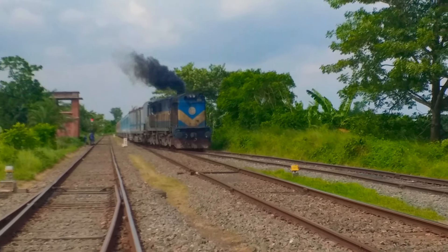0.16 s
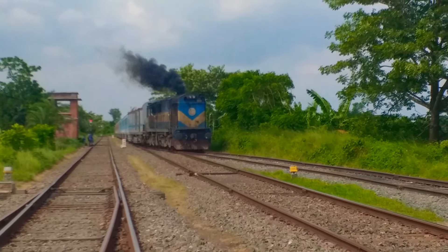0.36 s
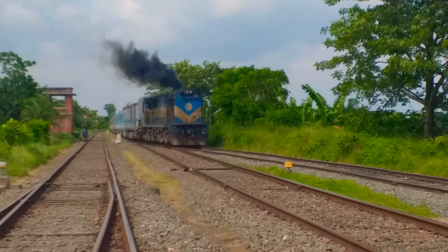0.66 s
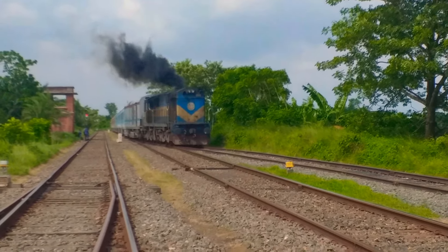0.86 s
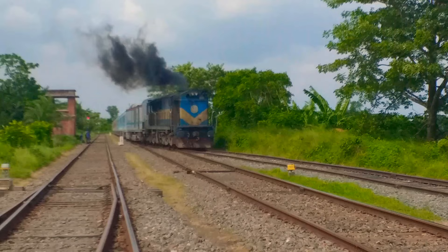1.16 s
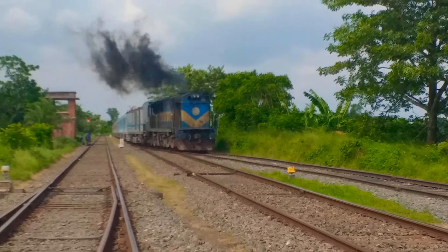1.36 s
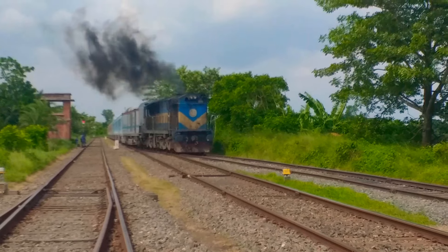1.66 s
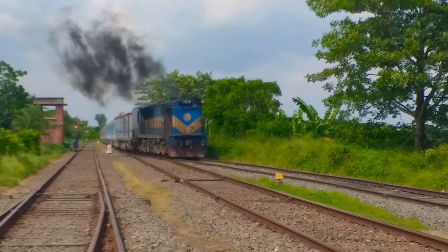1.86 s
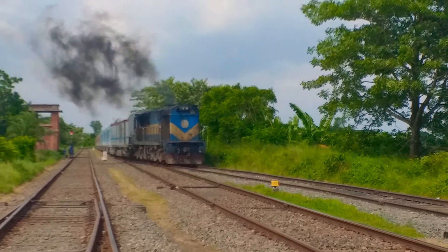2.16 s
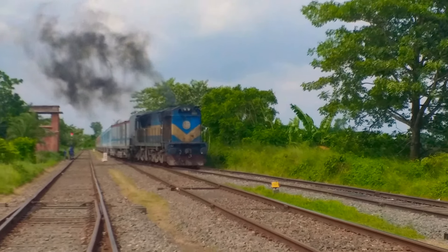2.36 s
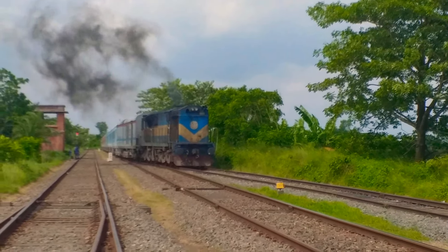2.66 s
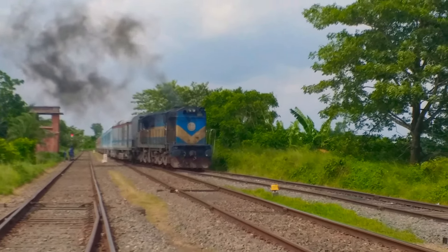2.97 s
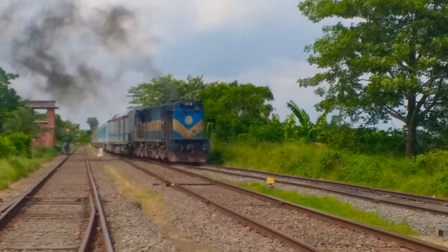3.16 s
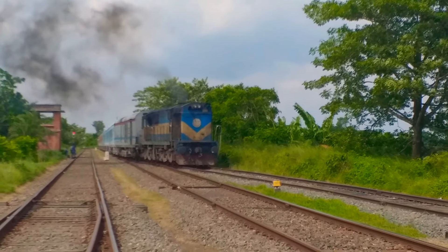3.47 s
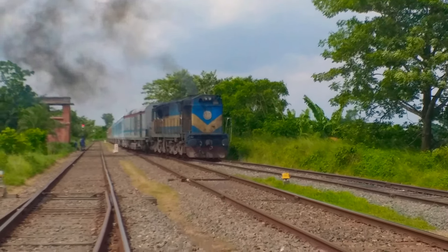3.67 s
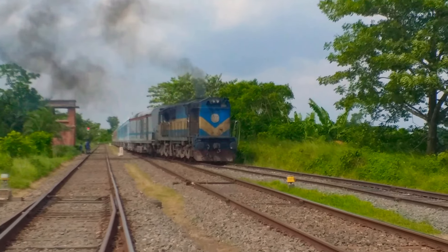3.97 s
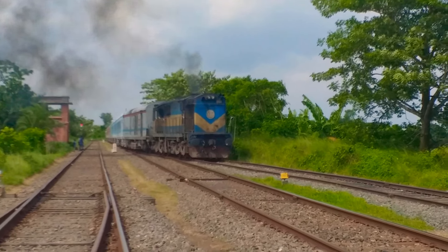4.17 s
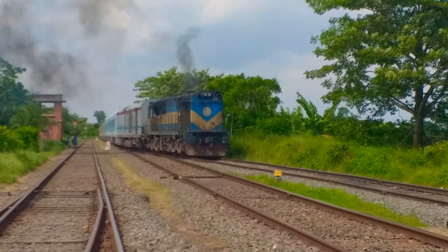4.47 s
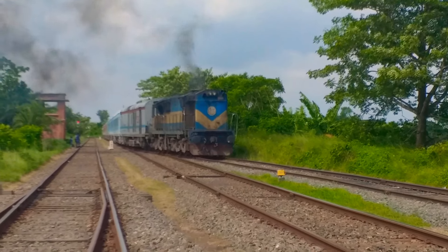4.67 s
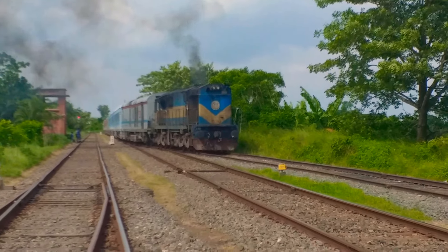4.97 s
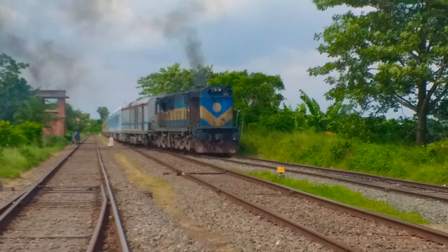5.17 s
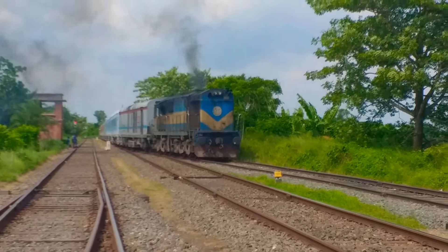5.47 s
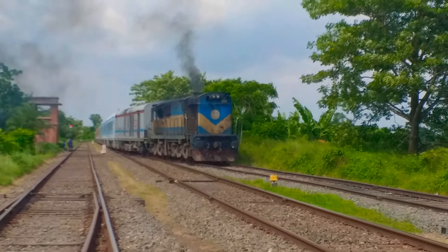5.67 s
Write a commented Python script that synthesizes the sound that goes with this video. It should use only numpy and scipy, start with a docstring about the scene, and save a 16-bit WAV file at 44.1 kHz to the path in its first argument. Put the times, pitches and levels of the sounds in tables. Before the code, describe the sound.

An open-air mono recording of a diesel locomotive coming slowly along the tracks. From the start there are low wind thuds on the microphone, a throbbing exhaust drone around 76 hertz with its stronger octave, and a hissing rush of machinery and wheels. From about 0.15 s a leak spits raspily, nearly five times a second, each with a bright crack, weak side puffs and a short scattered tail; a few catch brief whistles. Thin, unsteady wheel tones sing between 0.2 and 1.9 s. Gusts thump at 1.1-1.5 s; after 1.6 s the spits come slightly slower. More blows strike around 1.8 and 2.4-2.75 s. The hardest, from 3.55 to 4.1 s, boom, snap and crackle into overload. Then it calms, with spits softest near 4.9 s, leaving drone and hiss clear. A last gust thuds at 5.2-5.5 s as a faint high wheel tone rises and the engine strengthens.

```python
"""A diesel locomotive runs near a microphone in gusty wind, for almost six seconds.
At once there are low thuds, a droning exhaust and a hissing rush; soon a leak spits once per engine cycle.
Thin wheel tones sing early on. After 1.6 s the spits come slightly slower, and the gusts return in bursts.
The hardest thuds, near 3.6 s, drive a limiter; after a calmer spell, wheel tones and a last gust end the scene.
Shaped noise makes the hiss, rumble and wind; sine waves make the drone, whistles and wheel tones."""
import sys
import numpy as np
from scipy import signal
from scipy.fft import rfft, irfft
from scipy.io import wavfile
from scipy.ndimage import uniform_filter1d, minimum_filter1d

SR = 44100
rng = np.random.default_rng(int(sys.argv[2]) if len(sys.argv) > 2 else 0)


def wav_record(signal):
    """Record a signal, one row per channel, as 16-bit PCM in the file named by sys.argv[1]."""
    frames = np.transpose(np.atleast_2d(signal))
    bounded = np.clip(frames, -1, 1)
    # unit amplitude maps onto the largest positive 16-bit level
    quanta = np.round(bounded * 32767).astype(np.int16)
    wavfile.write(sys.argv[1], SR, quanta)


N = 256662
T = np.arange(N) / SR  # time of each sample, s
HZ = np.fft.rfftfreq(N, 1 / SR)


def gain_of(db):
    """Turns decibels into an amplitude factor."""
    return 10 ** (np.asarray(db) / 20)


def evened(x):
    """Scales a sound to an average strength (rms) of 1."""
    return x / np.sqrt(np.mean(x ** 2) + 1e-20)


def curves(rows):
    """Joins the points in each column of a table by straight lines in time."""
    s, *columns = np.transpose(rows)
    return [np.interp(T, s, column) for column in columns]


def noise(colour):
    """Makes noise of rms 1 whose spectrum follows points of (pitch_hz, level_db)."""
    hz, db = np.transpose(colour)
    spectrum_db = np.interp(np.log(HZ + 1), np.log(hz), db)
    return evened(irfft(rfft(rng.standard_normal(N)) * gain_of(spectrum_db), N))


def wander(rate_hz):
    """Makes a random motion of rms 1; a higher rate makes it quicker."""
    return evened(irfft(rfft(rng.standard_normal(N)) * np.exp(-(HZ / rate_hz) ** 2), N))


def patchy(x, depth_db):
    """Turbulent air lets small patches of time and frequency come through stronger or weaker."""
    z = signal.stft(x, nperseg=1024, noverlap=768)[2]
    patches = uniform_filter1d(rng.standard_normal(z.shape), size=5, axis=0)  # across frequency
    patches = evened(uniform_filter1d(patches, size=12, axis=1))  # across time
    return signal.istft(z * gain_of(depth_db * patches), nperseg=1024, noverlap=768)[1][:N]


def brighten(x, treble_db, split_hz=4000):
    """Raises or lowers everything above the split by a curve."""
    body = irfft(rfft(x) / (1 + (HZ / split_hz) ** 6), N)
    return body + gain_of(treble_db) * (x - body)


def add(mix, s, sound):
    """Adds a sound to the mix from time s on, cutting off what falls outside."""
    start = round(s * SR)
    sound = sound[max(-start, 0):]
    part = mix[max(start, 0):][:len(sound)]
    part += sound[:len(part)]


def wind_response(hz, corner_hz, low_cut_hz=61, knee_hz=135, damping=1.38, top_hz=3500, boom_hz=122, boom=0.44):
    """Wind pressure falls off above a knee and faster above the corner; the low cut makes it ring and boom."""
    low_cut = signal.freqs(*signal.butter(5, 1, "high", analog=True), hz / low_cut_hz)[1]
    s, b = 1j * hz / corner_hz, 1j * hz / boom_hz
    lift = 1 + boom * .5 * b / (1 + .5 * b + b ** 2)
    return lift * low_cut / (1 + 1j * hz / knee_hz) / (1 + damping * s + s ** 2) / (1 + 1j * hz / top_hz)


# a gust arrives at once, sags while it lasts, and dies away
GUST_ATTACK_DB_PER_S, GUST_SAG_DB, GUST_RELEASE_DB_PER_S = 1500, 3.5, 276


def gust_db(t, start, length, db):
    """Follows the strength of one gust at time t: attack, sagging hold, release."""
    early = np.maximum(start - t, 0)
    late = np.maximum(t - start - length, 0)
    sag_db = GUST_SAG_DB * np.clip((t - start) / length, 0, 1)
    return db - GUST_ATTACK_DB_PER_S * early - sag_db - GUST_RELEASE_DB_PER_S * late


# buffeting relative to its gust, between gusts, and the time over which it is smoothed
BREEZE_DB, CALM_DB, BREEZE_LAG_S = -0.5, -42, 0.037
# gusts at the microphone, also used by eddies(): start_s, length_s, relative strength_db, brightness_corner_hz
GUSTS = [(0, 0.043, -27, 330), (0.175, 0.13, -22.5, 340), (.3, 0.057, -29, 400), (0.499, 0.15, -30.5, 340),
         (1.169, 0.053, -18.5, 327), (1.315, .12, -14.5, 360), (1.814, 0.029, -20, 377),
         (2.36, 0.018, -15, 473), (2.552, 0.12, -18, 453), (2.725, 0.11, -25.5, 400),
         (3.058, 0.13, -19, 394.5), (3.543, 0.29, -17, 380), (3.854, .27, -14, 332),
         (4.11, 0.13, -20.5, 330), (4.25, 0.076, -30.5, 338), (5.226, 0.17, -25, 430)]


def breeze():
    """Makes lumpy low buffeting: wind noise that swells with the gusts."""
    power = sum(gain_of(gust_db(T, start, length, db) + BREEZE_DB) ** 2 for start, length, db, _ in GUSTS)
    smooth_power = abs(uniform_filter1d(power, int(BREEZE_LAG_S * SR)))
    swell = np.sqrt(smooth_power + gain_of(CALM_DB) ** 2)
    flow = evened(irfft(rfft(rng.standard_normal(N)) * wind_response(HZ, corner_hz=245), N))
    return swell * evened(flow * gain_of(1.47 * wander(rate_hz=24)))


EDDY_LEAD_S = .04  # room kept before the middle of an eddy


def eddy(db, spread_s, corner_hz):
    """Makes a short burst of random pressure on the microphone port."""
    size = 8192
    t, hz = np.arange(size) / SR - EDDY_LEAD_S, np.fft.rfftfreq(size, 1 / SR)
    z = rfft(rng.standard_normal(size) * np.exp(-(t / spread_s) ** 2 / 2))
    z /= np.sqrt(abs(uniform_filter1d(abs(z) ** 2, size=45)) + 1e-9)  # every eddy holds swirls of all sizes
    return gain_of(db - 9.0) * evened(irfft(z * wind_response(hz, corner_hz)))


# the small eddies that a gust sheds: how many, how long, and the largest random change of level
EDDIES_PER_S, EDDY_SPREAD_S, EDDY_SCATTER_DB = 44, .0028, 4.0
# thuds that stand out singly: middle_s, relative strength_db, spread_s, brightness_corner_hz
THUDS = [(.008, -16.5, 0.0032, 340), (.085, -16.5, 0.0025, 670), (.135, -10.5, 0.0089, 514),
         (0.1996, -13.5, 0.0044, 445), (.229, -9, 0.0036, 298), (.51, -21, 0.0051, 396),
         (.57, -18.5, 0.0064, 348), (0.659, -17.5, 0.0073, 320), (1.0762, -11, 0.0034, 355),
         (1.377, -9.5, 0.0042, 425), (1.414, -9.5, 0.0086, 309), (1.4751, -10, .0011, 460),
         (1.8264, -12, 0.0024, 470), (2.379, -14.5, 0.0011, 695), (2.395, -11, 0.0019, 386),
         (2.574, -5.5, 0.0038, 343), (2.596, -11, .0022, 504), (2.7326, -6, .0008, 634),
         (2.7434, -13, 0.0027, 390), (3.08, -15.5, 0.0048, 560), (3.165, -19.5, 0.0023, 450),
         (3.254, -16, 0.0053, 299), (3.505, -16.5, 0.0065, 480), (3.563, -0.5, 0.0025, 830),
         (3.588, -8, 0.0048, 672), (3.604, -8, 0.0021, 430), (3.632, -6.5, 0.0026, 350),
         (3.703, -14.5, 0.0036, 619), (3.734, -14, 0.0035, 487), (3.852, -16, 0.0015, 426),
         (3.877, -6, 0.004, 916), (3.937, -10, 0.0073, 644), (3.9994, -12, 0.0029, 470),
         (4.076, -4, 0.0019, 420), (5.178, -23, 0.0014, 490), (5.331, -15, 0.01, 457),
         (5.372, -10.5, 0.0058, 477), (5.392, -8.5, 0.0044, 373), (5.48, -19.5, 0.0067, 443)]


def eddies(colour_scatter=0.3):
    """Adds the hard thuds and the irregular train of smaller eddies that the gusts shed."""
    out = np.zeros(N)
    for s, *shape in THUDS:
        add(out, s - EDDY_LEAD_S, eddy(*shape))
    slots = np.arange(0, N / SR, 1 / EDDIES_PER_S)
    for slot, (late, strong, bright) in zip(slots, rng.uniform(-1, 1, (len(slots), 3))):
        s = slot + 0.397 * late / EDDIES_PER_S
        # the gust that is strongest at this moment sets level and brightness
        db, corner_hz = max((gust_db(s, start, length, db), hz) for start, length, db, hz in GUSTS)
        level_db = db + EDDY_SCATTER_DB * strong
        add(out, s - EDDY_LEAD_S, eddy(level_db, EDDY_SPREAD_S, corner_hz * np.exp(colour_scatter * bright)))
    return out


# sharp snaps where an eddy overloads the microphone: middle_s, peak_db, width_s (middle to peak)
SNAPS = [(2.733, -12.5, 0.000081), (3.5855, -4, 0.00024), (3.6035, -10.5, 0.00017), (3.932, -8, 0.00014),
         (3.9408, -9, 0.00025), (3.998, -6.5, 0.00023), (4.0752, -8, .00022)]


def snaps():
    """Makes each snap from one quick swing of pressure down and up."""
    t, out = np.arange(-.003, .003, 1 / SR), np.zeros(N)
    for s, db, width in SNAPS:
        add(out, s + t[0], gain_of(db) * t / width * np.exp((1 - (t / width) ** 2) / 2))
    return out


def wind(crackle_db=-23):
    """Joins eddies, breeze and snaps; strong pressure also tears into a fine crackle."""
    pressure = eddies() + breeze()
    crackle_colour = [(300, -10.0), (800, 7.0), (1300, -15), (2500, -17.0), (4500, -28), (9000, -54)]  # Hz, dB
    crackle = np.tanh(pressure) ** 2 * noise(crackle_colour)
    return pressure + gain_of(crackle_db) * crackle + snaps()


# rush of machinery and wheels: time_s, relative level_db, extra_treble_db
RUSH = [(0, -31.5, -4.5), (.9, -35.5, 1), (1.25, -39, -1), (1.9, -39.5, -3), (2.7, -37, -1),
        (3.55, -37, -5), (3.95, -36, -6.5), (4.5, -40.5, -3), (5.1, -39.5, -5.5), (5.45, -38, -1.5),
        (5.82, -36, -2)]
# its colour: pitch_hz, relative level_db
RUSH_COLOUR = [(250, 13), (500, -22), (800, 4), (1300, 0), (2100, 2.5), (2800, 2.5), (3900, 1.5), (4600, 2),
               (5400, 4.5), (6800, 4), (8100, -11), (9000, -17), (10500, -9.5), (15800, -11.5)]


def rush():
    """Makes the hiss of machinery and wheels from noise with a fine rattle in its level."""
    level_db, treble_db = curves(RUSH)
    hiss = noise(RUSH_COLOUR) * gain_of(level_db - 2.5 + 1.06 * wander(rate_hz=70))
    return brighten(patchy(hiss, depth_db=3.0), treble_db)


# faint singing of the wheel flanges: start_s, end_s, pitch_hz, level_db (at the top of the swell)
SQUEALS = [(.2, .6, 12180, -66), (.3, 1.05, 2850, -45.5), (.85, 1.26, 3280, -48.5), (.62, 1.85, 10700, -66),
           (.85, 1.9, 10000, -64.5), (1.25, 1.7, 6180, -53), (2.4, 2.65, 10610, -64), (4.7, 5.5, 3040, -58),
           (5.3, 5.95, 3040, -47.5)]


def flanges(waver_hz=20, flutter_db=1.5):
    """Wheels rubbing on the curve ring in thin, unsteady tones."""
    out = np.zeros(N)
    for start, end, hz, db in SQUEALS:
        swell = np.sqrt(np.clip(4 * (T - start) * (end - T) / (end - start) ** 2, 0, 1))
        tone = np.sin(2 * np.pi * np.cumsum(hz + waver_hz * wander(rate_hz=63.4)) / SR)
        out += gain_of(db) * swell * evened(tone * gain_of(flutter_db * wander(rate_hz=32)))
    return out


FIRST_SPIT_S, FAST_CYCLE_S, SLOW_CYCLE_S, SLOWS_AT_S = .1427, .2069, .21816, 1.59


def engine_cycles():
    """Counts engine cycles from the first spit; the cycle slows once."""
    cycle_s = np.where(T < SLOWS_AT_S, FAST_CYCLE_S, SLOW_CYCLE_S)
    return np.cumsum(1 / cycle_s) / SR - FIRST_SPIT_S / FAST_CYCLE_S


# exhaust drone: time_s, firing_rate_hz, relative fundamental_db, relative overtones_db (rumble follows these too)
DRONE = [(0, 77.5, -19.5, -37.5), (.35, 81.5, -34, -38.5), (.95, 76.2, -32.5, -39.5), (2.2, 75.7, -36, -38),
         (2.8, 75.9, -28.5, -37), (3.1, 75.4, -35, -42.5), (4.25, 77.2, -31, -34), (4.45, 74, -43, -41),
         (4.7, 75.8, -31.5, -43.5), (4.98, 76.5, -45, -45), (5.1, 77.6, -36, -40), (5.75, 75.5, -28, -34),
         (5.82, 75.5, -30, -40)]
# overtones of the drone: multiple (of the firing rate), relative level_db
OVERTONES = [(2, 9.5), (3, -16.5), (4, -25), (5, -48)]
# uneven rumble of the exhaust: pitch_hz, relative level_db
RUMBLE_COLOUR = [(15, -45), (35, -34), (55, 5.5), (80, -12.5), (100, -4), (135, 6), (165, -2), (200, -8),
                 (260, -18), (340, -17), (450, -25), (700, -19), (2000, -79)]


def exhaust():
    """Makes a firing tone, with overtones and a rumble that throb with the engine cycle."""
    firing_hz, fundamental_db, overtone_db = curves(DRONE)
    turns = np.cumsum(firing_hz * (1 + .03 * wander(rate_hz=14))) / SR
    fundamental = evened(np.sin(2 * np.pi * turns) * gain_of(1.6 * wander(rate_hz=23)))
    overtones = np.zeros(N)
    for k, db in OVERTONES:
        tone = np.sin(2 * np.pi * (round(k) * turns + rng.random()))
        overtones += gain_of(db + 1.13 * wander(rate_hz=6)) * tone
    throb_db = 1.8 * np.cos(2 * np.pi * (engine_cycles() - .08))
    throbbing = gain_of(-0.5) * evened(overtones) + gain_of(3.4) * noise(RUMBLE_COLOUR)
    return gain_of(fundamental_db + 0.5) * fundamental + gain_of(overtone_db + throb_db) * throbbing


# brief whistles with the spits: middle_s, pitch_hz, level_db
WHISTLES = [(0.127, 2640, -23.5), (.566, 4900, -29), (1.806, 4660, -25), (2.244, 2610, -27.5),
            (2.46, 2610, -29), (2.901, 2900, -35), (3.989, 2680, -24), (4.642, 4740, -30.5)]


def whistles(spread_s=0.0075, width_hz=130):
    """A spit can catch the edge of the leak and ring for a few milliseconds."""
    t, out = np.arange(-.04, .04, 1 / SR), np.zeros(N)
    for (s, hz, db), jitter in zip(WHISTLES, rng.standard_normal((len(WHISTLES), len(t)))):
        # phase drift widens the tone
        phase = np.cumsum(2 * np.pi * hz / SR + jitter * np.sqrt(2 * np.pi * width_hz / SR))
        add(out, s + t[0], gain_of(db) * np.exp(-(t / spread_s) ** 2) * np.sin(phase))
    return out


# spits open more softly while the engine runs fast
RISE_FAST_S, RISE_SLOW_S, SPIT_FALL_S = 0.0091, 0.0085, 0.0086
SPIT_SCATTER_DB, SPIT_LENGTH_SCATTER = 4.8, 0.51  # no two spits are quite alike
# each spit opens with a bright crack, just ahead of its peak
CRACK_DB, CRACK_LEAD_S, CRACK_FALL_S = -8.5, 0.0048, 0.0055
# the leak, which spits once per engine cycle: time_s, relative level_db, extra_treble_db
LEAK = [(0, -31, 4.5), (1.4, -28.5, 5), (2.05, -31.5, 4), (2.65, -27.5, -5), (3.3, -31, -3.5),
        (3.8, -25.5, -1.5), (4.45, -34.5, 1.5), (4.9, -40.5, 3), (5.3, -30.5, 3), (5.82, -34, 6)]
# colour of a spit: pitch_hz, relative level_db
SPIT_COLOUR = [(200, -29), (500, -21), (900, 3), (1700, -3), (2700, 4.5), (3400, -2.5), (4500, 0.5),
               (6400, 0.5), (7200, -3.5), (8100, -15.5), (9000, -22), (10300, -14), (12500, -13.5),
               (15800, -22)]
# colour of the crack: pitch_hz, relative level_db
CRACK_COLOUR = [(2000, -27), (4500, 0), (7000, 0.5), (8100, -12), (9000, -13), (10300, -4), (15800, -9)]


def leak(tail_db=-11, tail_s=0.074, early_db=-15, early_s=0.036, late_db=-19, late_s=0.081, weak_s=0.0094):
    """One cylinder spits each cycle and the trees scatter a tail; two others puff weakly around it."""
    power, crack, cycles = np.zeros(N), np.zeros(N), engine_cycles()
    level_db, treble_db = curves(LEAK)
    t = np.arange(-.08, .3, 1 / SR)  # time from the peak of a spit
    before, after = np.maximum(-t, 0), np.maximum(t, 0)
    tail = gain_of(tail_db) ** 2 * np.exp(-2 * after / tail_s)
    early_puff = gain_of(early_db) ** 2 * np.exp(-((t + early_s) / weak_s) ** 2)
    late_puff = gain_of(late_db) ** 2 * np.exp(-((t - late_s) / weak_s) ** 2)
    crack_shape = (t > 0) * np.exp(-2 * after / CRACK_FALL_S)
    times = np.interp(np.arange(cycles[-1]), cycles, T)
    for s, (strong, long) in zip(times, rng.uniform(-1, 1, (len(times), 2))):
        rise = np.exp(-2 * before / (RISE_FAST_S if s < SLOWS_AT_S else RISE_SLOW_S))
        fall = np.exp(-2 * after / (SPIT_FALL_S * np.exp(SPIT_LENGTH_SCATTER * long)))
        spit = gain_of(SPIT_SCATTER_DB * strong) ** 2 * rise * (fall + tail)
        add(power, s + t[0], spit + early_puff + late_puff)
        add(crack, s + t[0] - CRACK_LEAD_S, crack_shape)
    # the square root turns power into amplitude
    jet = np.sqrt(power) * noise(SPIT_COLOUR) + gain_of(CRACK_DB) * np.sqrt(crack) * noise(CRACK_COLOUR)
    jet = jet * gain_of(level_db + .5 + 1.3 * wander(rate_hz=410))  # the jet rasps
    return patchy(brighten(jet, treble_db, split_hz=4400), depth_db=3.0)


# broad resonances that colour the hiss of leak and rush: pitch_hz, half_width_hz, relative lift_db
HUMPS = [(856, 360, 9.5), (1701, 245, 11), (2565, 410, 6), (3386, 430, 9), (4260, 206, 9.5), (4674, 264, 8),
         (5350, 120, 2.5), (6280, 960, 1.5)]


def resonant(x):
    """Passes the hiss through its broad resonances."""
    lift_db = sum(db * np.exp(-((HZ - hz) / width) ** 2) for hz, width, db in HUMPS)
    return irfft(rfft(x) * gain_of(lift_db - 4.5), N)


# level of the highest hiss, above about 6.6 kHz: time_s, extra_level_db
TOP_HISS = [(0, 0), (1, -3), (2, 1.5), (3.3, 5), (3.9, 1.5), (4.8, 2.5), (5.82, -1)]


def scene():
    """Mixes the train with the wind at the microphone."""
    hiss = brighten(resonant(leak() + rush()), curves(TOP_HISS)[0], split_hz=6600)
    return (wind() + flanges() + exhaust() + whistles() + hiss)[None]


EDGE_HZ = 15850  # upper band limit


def record(dry):
    """A fast limiter holds the strongest thuds near full scale; then come a low cut and a band limit."""
    headroom = minimum_filter1d(1 / np.maximum(abs(dry), 1), size=500)
    limited = dry * uniform_filter1d(headroom, size=500)
    low_cut = HZ ** 6 / (HZ ** 6 + 38 ** 6)
    thinned = irfft(rfft(limited) * low_cut, N)
    band_limit = signal.firwin(511, EDGE_HZ, window=("kaiser", 9), fs=SR)
    return signal.oaconvolve(thinned, band_limit[None], "same")


dry = scene()
out = record(dry)
wav_record(out)
```